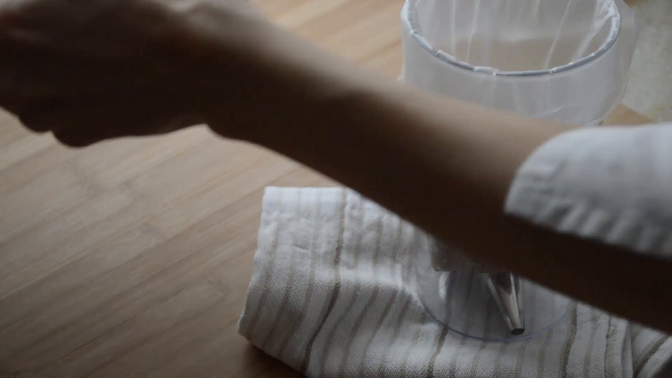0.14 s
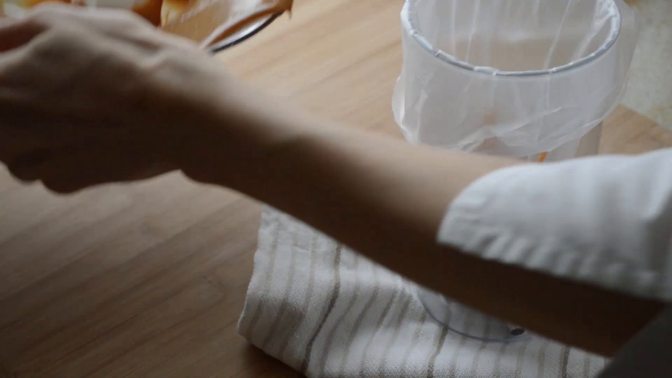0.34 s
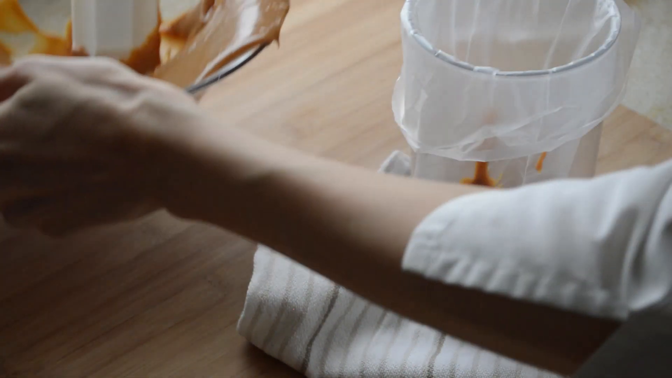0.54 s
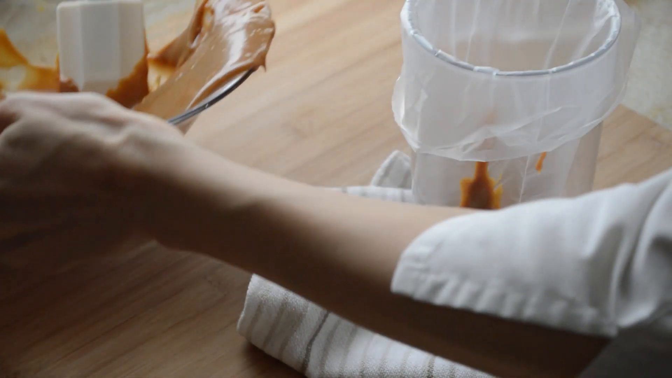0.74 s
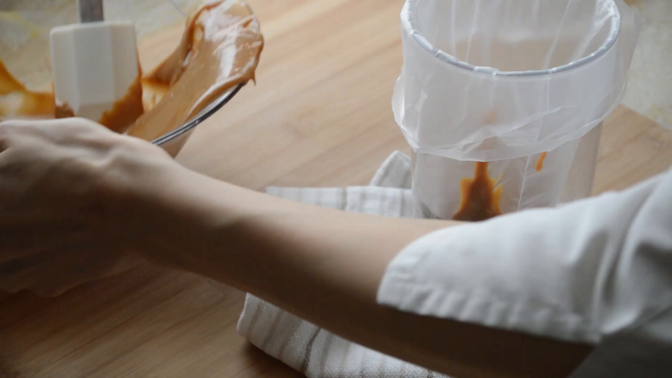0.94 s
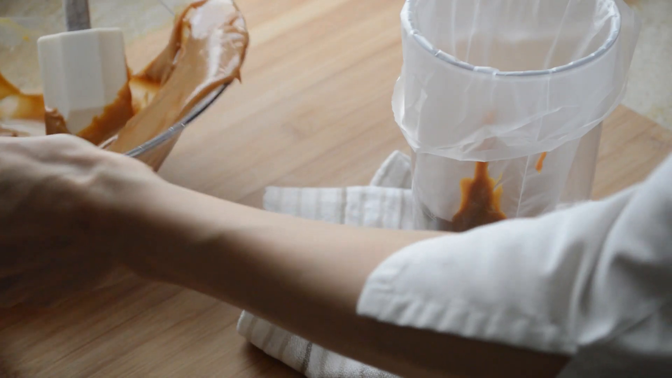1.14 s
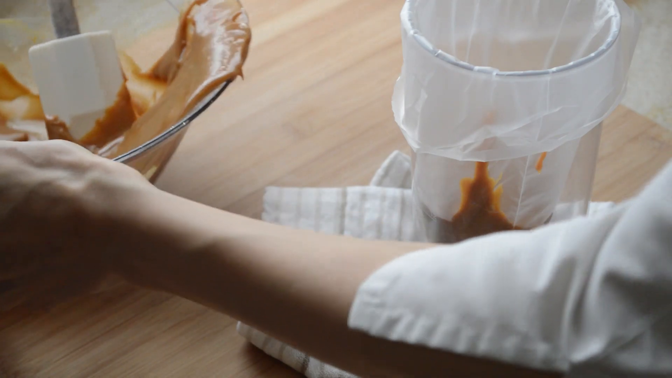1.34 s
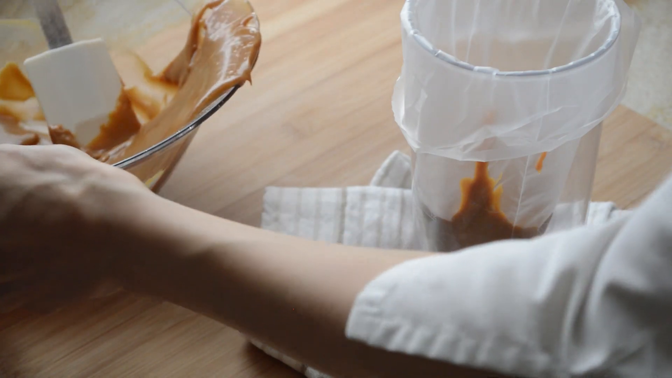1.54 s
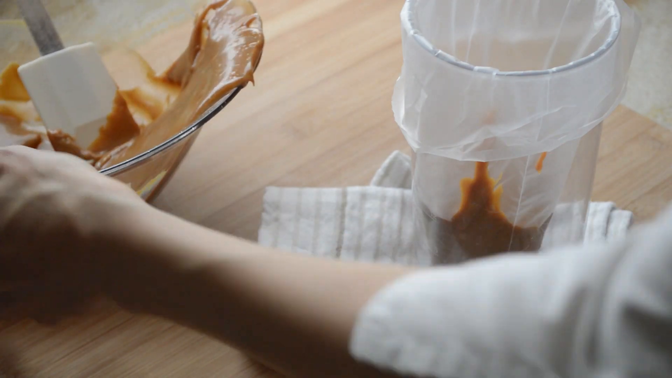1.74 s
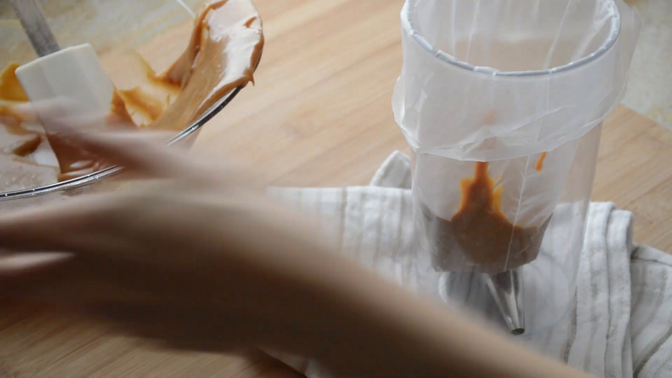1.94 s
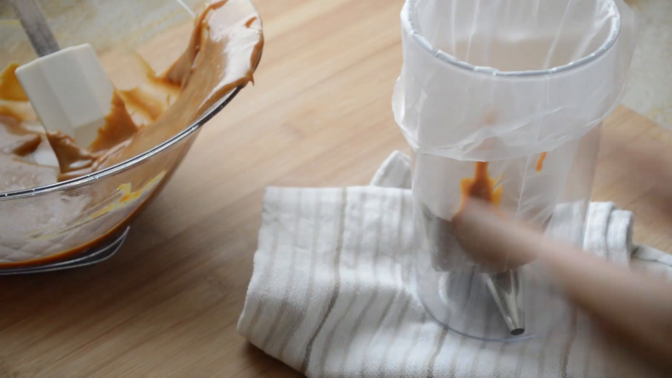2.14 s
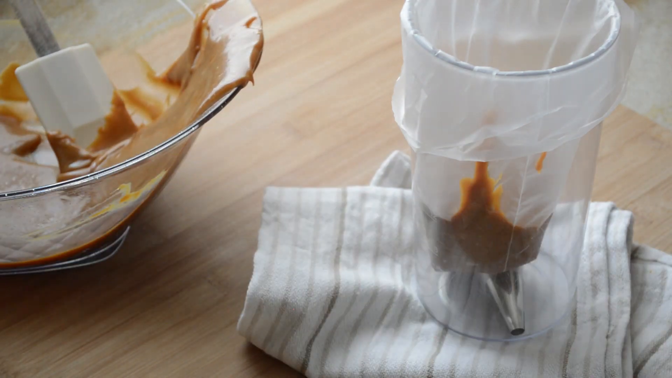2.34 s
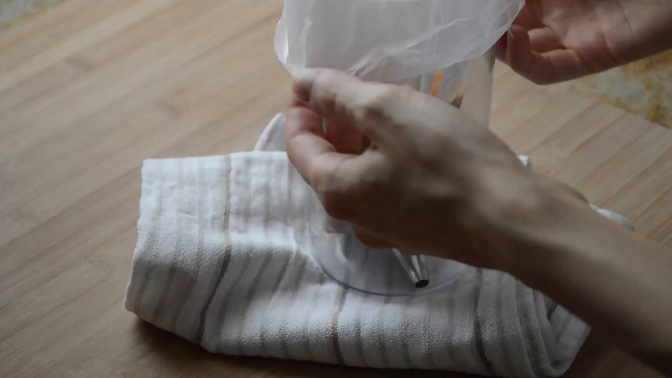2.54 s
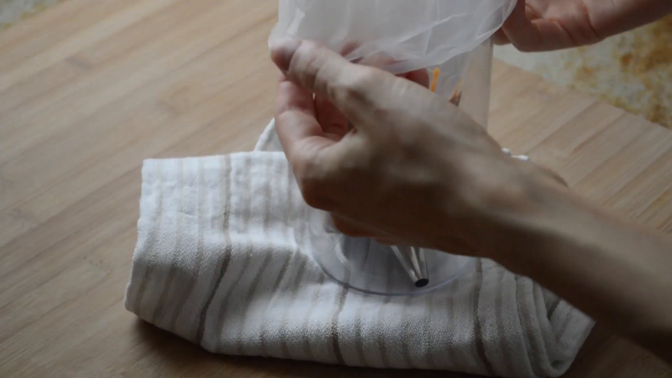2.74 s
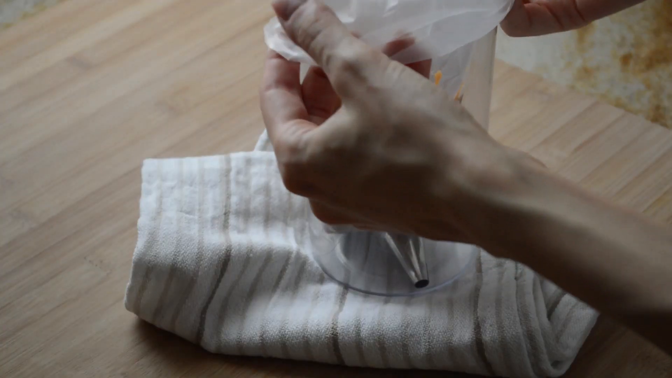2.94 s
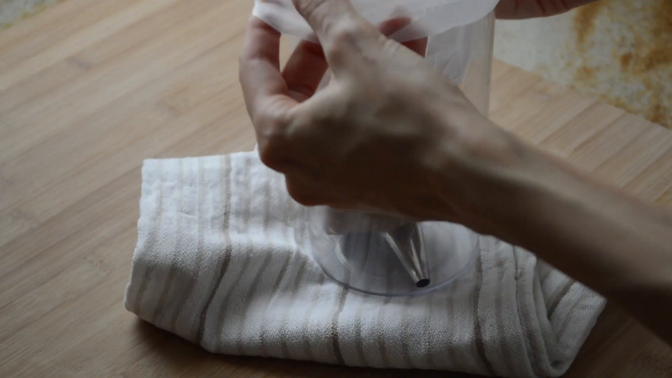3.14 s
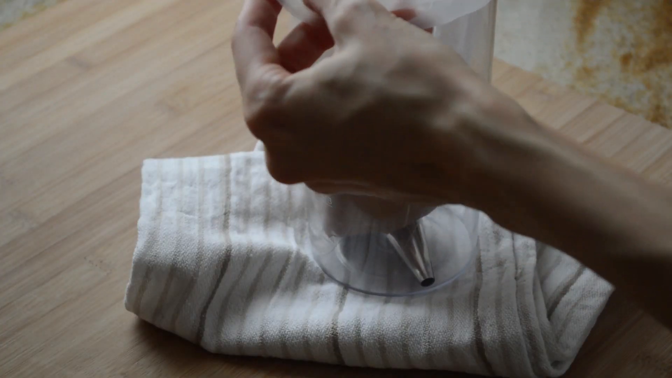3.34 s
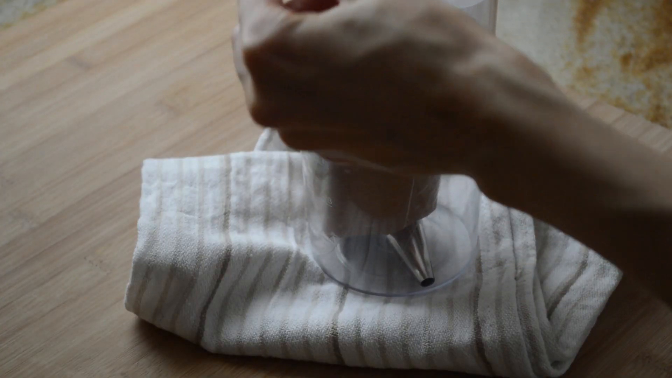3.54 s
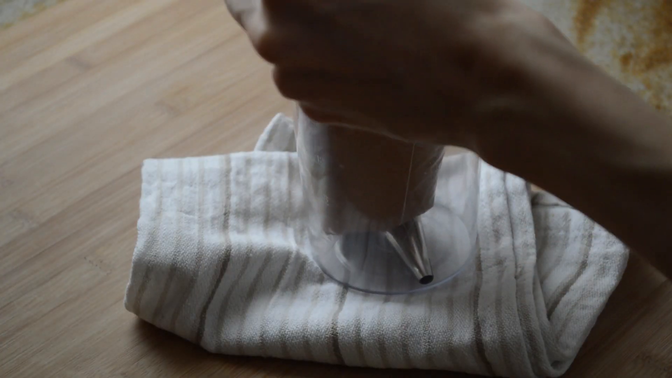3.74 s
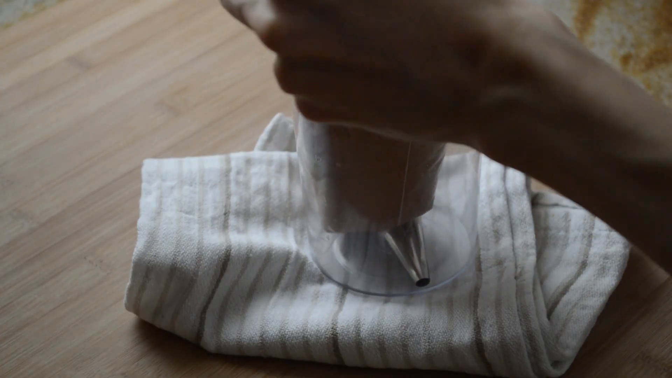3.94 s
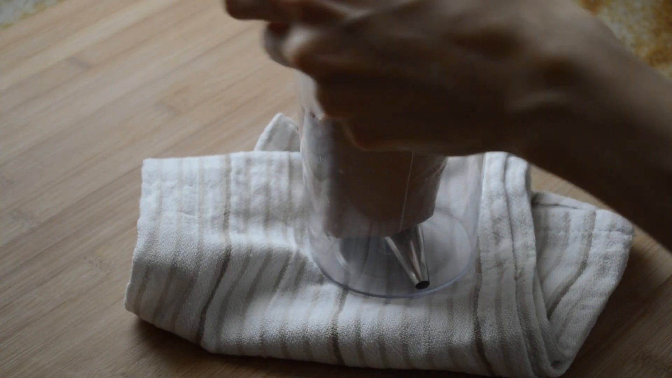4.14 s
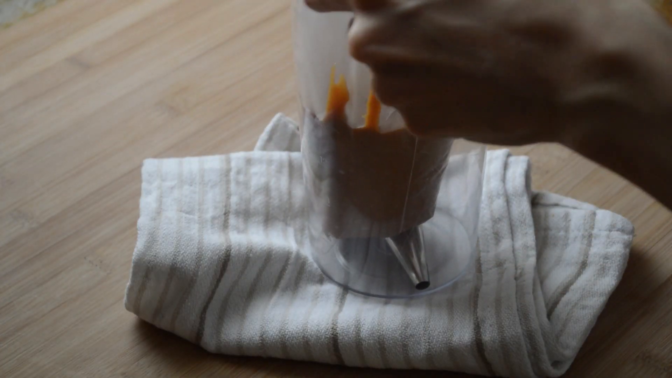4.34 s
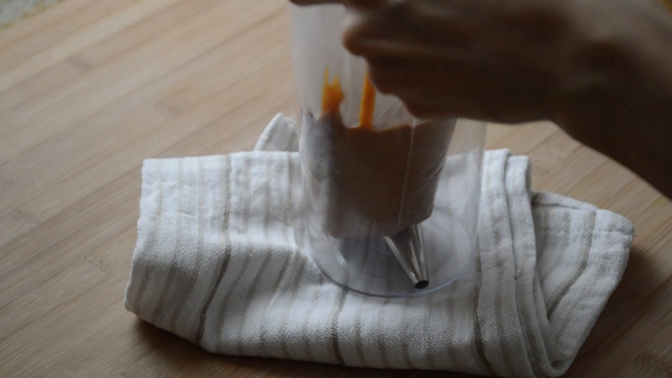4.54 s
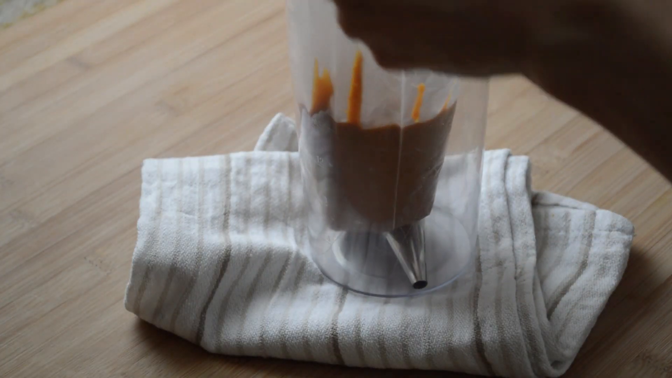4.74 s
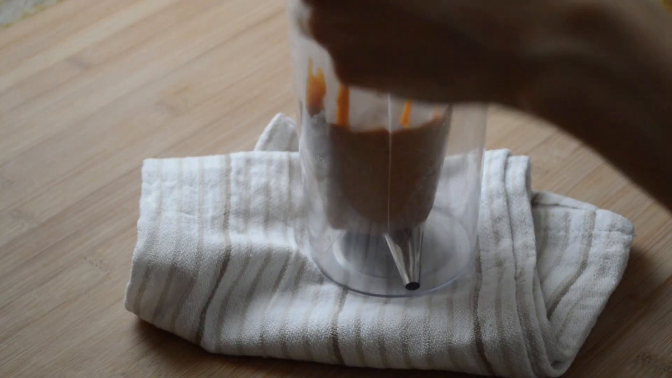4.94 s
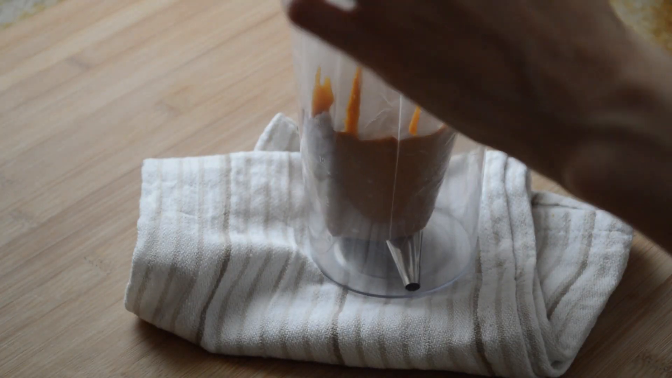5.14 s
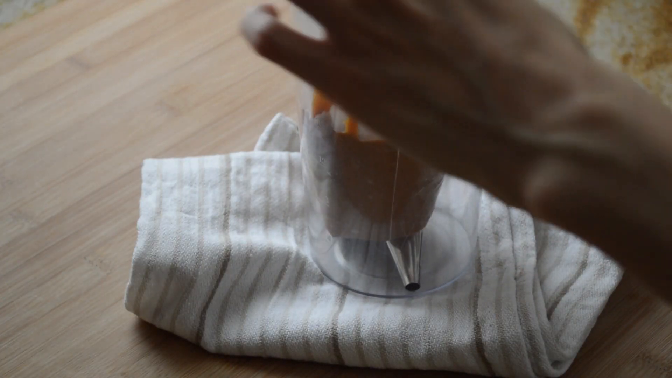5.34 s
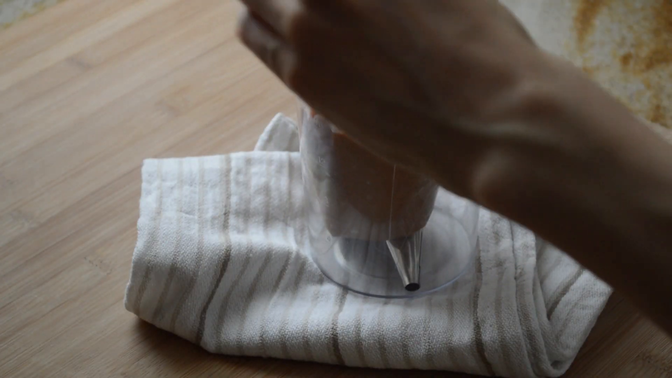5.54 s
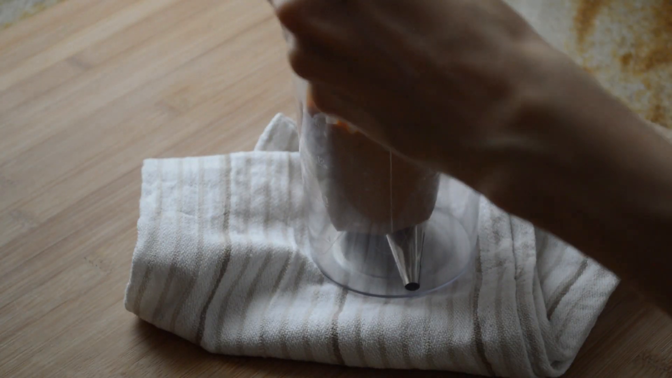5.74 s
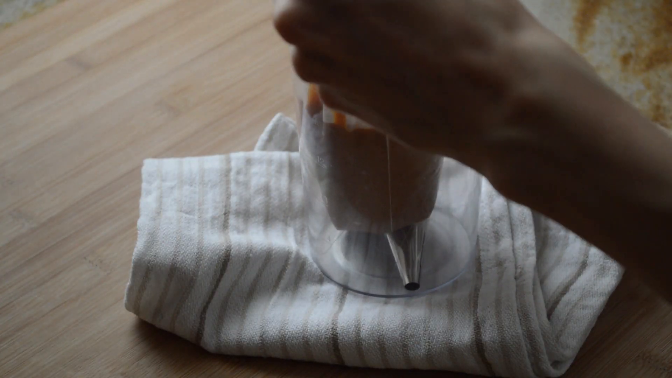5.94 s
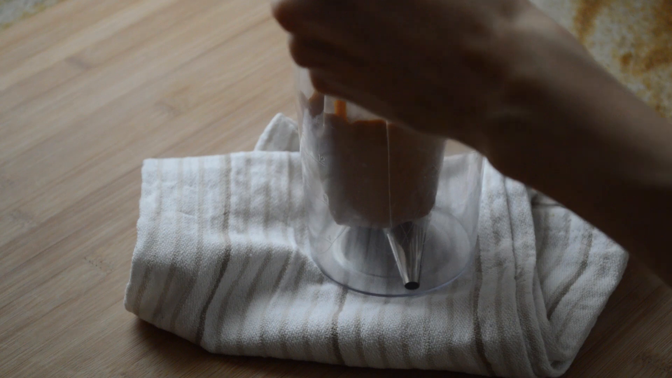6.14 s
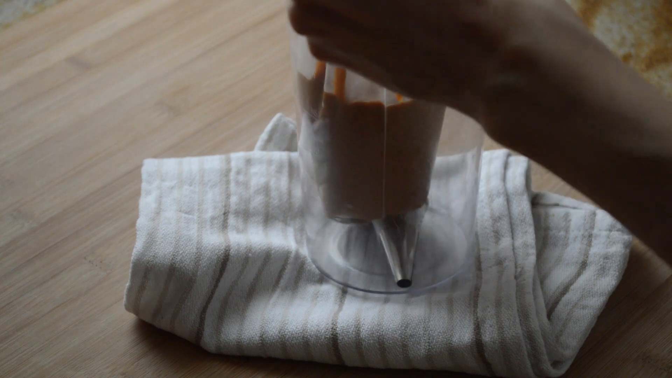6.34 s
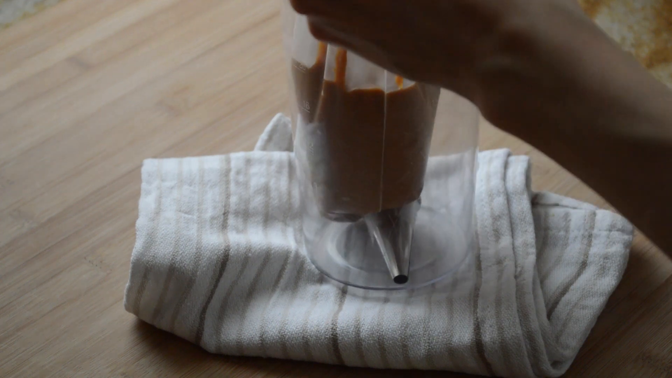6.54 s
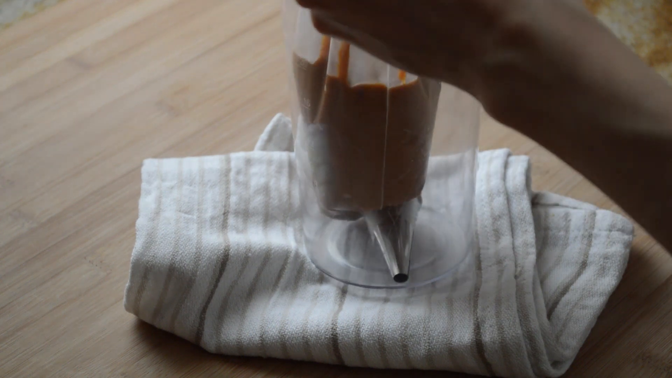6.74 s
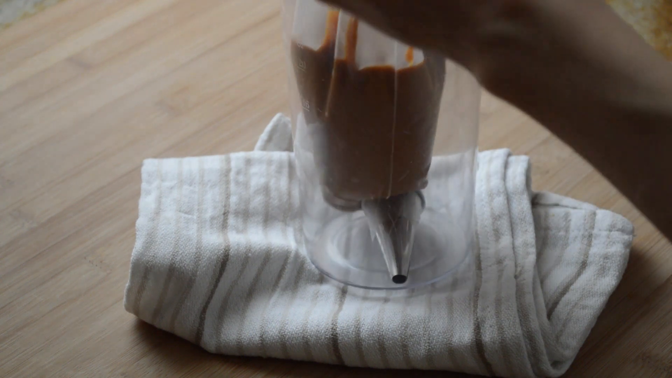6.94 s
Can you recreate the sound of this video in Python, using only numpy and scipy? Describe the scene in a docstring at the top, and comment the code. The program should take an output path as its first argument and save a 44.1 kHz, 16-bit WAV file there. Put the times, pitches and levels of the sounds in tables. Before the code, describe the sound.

In a quiet humming kitchen, a glass bowl knocks onto a wooden worktop, then a thin plastic bag crinkles loudly as it is gathered and twisted.

```python
"""A small kitchen with a low hum, heard close: a glass bowl is set down on a wooden worktop and rocks to rest.
Knocks ring decaying modes; sleeves swish as filtered noise, and fingers tick twice against a plastic jug.
Then a thin plastic piping bag is gathered and twisted shut: creases snap as millisecond noise bursts over
a dense crackle of tiny buckles, and wider folds pop and ring the hollow pouch with a sagging pitch."""
import sys
import numpy as np
from scipy import signal
from scipy.fft import rfft, irfft, next_fast_len
from scipy.io import wavfile
from scipy.ndimage import uniform_filter1d

SR = 44100
rng = np.random.default_rng(int(sys.argv[2]) if len(sys.argv) > 2 else 0)


def int16_out(signal):
    """Quantize to a 16-bit WAV file."""
    q = np.round(np.clip(np.atleast_2d(signal).T, -1, 1) * 32767)
    wavfile.write(sys.argv[1], SR, q.astype(np.int16))


N = 307818
T = np.arange(N) / SR

# colour of the thin plastic film: (f/Hz, level/dB)
FILM_COLOUR = [(1000, -21), (1400, -6.5), (1900, -2.5), (3000, -2), (4600, 1.5), (6200, -0.5), (8200, -8.5),
               (10500, -5), (12500, -8), (14500, -17.5), (16000, -28)]
# colour of the air-filled pouch: (f/Hz, level/dB)
POUCH_COLOUR = [(40, -53), (90, -36.5), (220, -12), (340, -7.5), (460, -0.5), (540, -3), (680, -3),
                (920, 2.5), (1150, -1.5), (1400, -8.5), (2200, -28.5)]
# squeezes and twists of the hands: (start t/s, length/s, crackle level/dB, treble/dB, body/dB,
# depth/dB: how much long creases favour the low end)
HAND_SQUEEZES = [(2.66, .09, -41.5, -10, -16, -19), (2.777, 0.39, -26, -4.5, -17, -13),
                 (3.142, 0.29, -25, -3, -14.5, -9.5), (3.461, .35, -25.5, -2.5, -10.5, -10),
                 (3.858, 0.085, -24.5, 2.5, -11.5, -1), (4, 0.09, -26.5, -1, -11, 3),
                 (4.216, 0.13, -31.5, 0, -6.5, -0.5), (4.394, 0.2, -26.5, -1, -8, 0),
                 (4.548, 0.25, -23.5, -1.5, -9.5, 2), (4.76, .22, -24, 2.5, -6, 8),
                 (5.046, 0.059, -35, 6, 0.5, 5), (5.343, 0.05, -51.5, -6, 2, -1),
                 (5.447, 0.32, -27, -0.5, -7.5, -0.5), (5.819, 0.21, -28, 1, -10.5, -3),
                 (6.071, 0.18, -25, 1.5, -9.5, 4), (6.296, 0.058, -27.5, 4, -5.5, 4),
                 (6.453, .05, -41.5, -8, -16, -15), (6.517, 0.052, -34, -13, -8, -3),
                 (6.618, 0.17, -29, 0.5, -12.5, 1.5), (6.8, .19, -23.5, -2.5, -10.5, 6.5)]


def undb(db):
    """Decibels to gain."""
    return 10 ** (np.asarray(db) / 20)


def unit(x):
    """Scale to rms 1."""
    return x / np.sqrt(np.mean(x ** 2) + 1e-18)


def along(points, hz):
    """Read (Hz, value) points on a log-frequency axis."""
    f, v = np.transpose(points)
    return np.interp(np.log(np.maximum(hz, 1)), np.log(f), v)


def add(out, s, x):
    """Mix x into out from time s on."""
    i = max(int(s * SR), 0)
    out[i:i + len(x)] += x[:max(len(out) - i, 0)]


def response(points, size=512):
    """Causal impulse response of unit energy with the colour of (Hz, dB) points."""
    # folding the cepstrum forward in time gives minimum phase
    cepstrum = irfft(np.log(undb(along(points, np.fft.rfftfreq(size, 1 / SR)))))
    cepstrum[1:size // 2] *= 2
    cepstrum[size // 2 + 1:] = 0
    h = irfft(np.exp(rfft(cepstrum)))
    return h / np.linalg.norm(h)


def through(x, h):
    """Pass x through an impulse response."""
    return signal.fftconvolve(x, h)[:len(x)]


def brighten(x, db, hz=5600):
    """Tip the range above hz against the range below by db, keeping the power about the same."""
    size = next_fast_len(len(x))
    f = np.fft.rfftfreq(size, 1 / SR)
    low = irfft(rfft(x, size) / (1 + (f / hz) ** 4), size)[:len(x)]
    return (low + undb(db) * (x - low)) / np.sqrt((1 + undb(2 * db)) / 2)


def walk(rate):
    """Slow chance with a spread of 1, taking a new random target rate times a second."""
    knots = rng.standard_normal(2048)
    return unit(np.interp(T * rate, np.arange(len(knots)), knots))


def ring(hz, t60, t):
    """One decaying mode."""
    return np.sin(2 * np.pi * hz * t) * np.exp(-np.log(1000) * t / t60)


def background(air_db=-50.5, waver=0.37):
    """Steady kitchen air as coloured noise, and an appliance's hum wavering in phase and strength."""
    # colour of the air: (f/Hz, level/dB)
    air_colour = [(15, -16), (35, -25), (60, -3.5), (80, -8), (112, 2.5), (160, -5.5), (250, -7.5),
                  (450, -11.5), (650, -12.5), (1000, -17.5), (2000, -23), (4000, -38), (8000, -29),
                  (16000, -28.5)]
    # partials of the hum: (f/Hz, level/dB)
    hum_partials = [(60, -64), (98.5, -58), (119, -73.5)]
    air = through(rng.standard_normal(N), response(air_colour, size=8192)) * undb(air_db)
    hum = np.zeros(N)
    for hz, db in hum_partials:
        tone = np.sin(2 * np.pi * hz * T + waver * walk(6.5))
        hum += undb(db) * unit(tone * (1 + waver * walk(7.1)))
    return air + hum


def sleeves(db=-1, rustle_db=-56.5):
    """Cotton slides with a soft hiss that swells and fades with each arm movement."""
    # arm movements that slide a sleeve: (middle t/s, half length/s, level/dB)
    swishes = [(.15, .25, -55), (.56, 0.035, -56.5), (0.934, 0.079, -62), (1.375, 0.025, -56),
               (1.853, 0.17, -56), (2.12, 0.16, -46.5), (2.4, 0.026, -46.5), (2.495, 0.029, -45.5)]
    # colour of the cloth: (f/Hz, level/dB)
    cloth_colour = [(300, -19), (900, -5.5), (2200, -3), (3300, -3), (4300, -3.5), (5600, -2.5),
                    (8000, -11.5), (12000, -16.5), (16000, -31)]
    power = np.full(N, undb(rustle_db) ** 2)  # cloth between the movements
    for s, half, swish_db in swishes:
        swell = np.exp(-((T - s) / half) ** 2 / 2)
        power += (undb(swish_db) * swell) ** 2
    return undb(db) * np.sqrt(power) * through(rng.standard_normal(N), response(cloth_colour))


def knocks(focus_db=3.5, radiate_hz=230, spread_s=0.001):
    """The bowl lands and rocks; place and hardness of each contact weight the same modes."""
    # knocks of the bowl on the worktop: (t/s, level/dB, upper limit of the contact f/Hz,
    # most excited pitch f/Hz, share of the ring time that the contact leaves)
    contacts = [(0.077, -33, 1970, 1180, 0.82), (0.994, -10, 5640, 766, 1.05), (1.052, -23, 800, 600, 1.3),
                (1.1102, -17.5, 1820, 1410, 0.55), (1.1432, -16, 910, 550, 0.67),
                (1.1494, -20, 2030, 850, 0.86), (1.2244, -11.5, 4200, 506, 0.65), (1.28, -33, 900, 335, .8),
                (1.706, -33.5, 2820, 2000, 0.73), (1.715, -38, 2470, 200, 0.88)]
    # modes of bowl and worktop: (f/Hz, level/dB, t60/s)
    bowl_modes = [(115, -8, 0.068), (210, -33, 0.03), (334, -34, .07), (407.5, -16, 0.18), (526, 2, 0.024),
                  (569, -11.5, 0.046), (643, -14, 0.12), (823, -11.5, 0.068), (1197, -10, 0.033),
                  (1845, -19.5, 0.022), (1916, -13, 0.056), (2065, -3, 0.015), (2305, -12, 0.062),
                  (2450, -19, 0.067), (3300, -17, 0.04), (3800, 5, 0.0017), (4200, -21, 0.03),
                  (5940, -28, .003)]
    out, t = np.zeros(N), T[:12000]
    hz, mode_db, t60 = np.transpose(bowl_modes)
    for s, level_db, contact_hz, centre_hz, free in contacts:
        # modes lose focus_db for each octave away from the most excited pitch
        weight = undb(mode_db - focus_db * abs(np.log2(hz / centre_hz)))
        detune = 1 + 0.023 * rng.standard_normal(len(hz))
        # bending waves are slower at low pitch, so the low modes arrive later
        lag = spread_s * np.sqrt(centre_hz / hz)
        age = np.maximum(t - (lag - lag.min())[:, None], 0)
        blow = weight @ ring((hz * detune)[:, None], free * t60[:, None], age)
        # a soft contact cannot drive the treble, and the board radiates little bass
        blow = signal.sosfilt(signal.butter(3, contact_hz, fs=SR, output="sos"), blow)
        blow = signal.sosfilt(signal.butter(1, radiate_hz, "high", fs=SR, output="sos"), blow)
        add(out, s, undb(level_db) * blow / abs(blow).max())
    return out


def ticks(fall_s=0.0042):
    """A fingertip meets the plastic jug with a small dry click: decaying noise in the jug's colour."""
    # finger ticks: (t/s, level/dB)
    touches = [(2.245, -34.5), (2.3695, -29)]
    # colour of the jug: (f/Hz, level/dB)
    jug_colour = [(300, -19), (1000, 7), (1600, -9), (2800, 0), (5000, 1), (7500, -16), (16000, -30)]
    out, t = np.zeros(N), T[:2048]
    for s, tick_db in touches:
        click = np.exp(-t / fall_s) * rng.standard_normal(len(t))
        add(out, s, undb(tick_db) / 2 * through(click, response(jug_colour)))
    return out


def effort(grip_s=0.052, relax_s=0.056, dulling=0.29):
    """Crackle level (gain), treble, body and depth (dB): squeezes build, hold and die away, ever duller."""
    power, treble, body, depth = np.zeros((4, N)) + 1e-18
    for s, length, db, treble_db, body_db, depth_db in HAND_SQUEEZES:
        settled = np.maximum(T - s - length, 0) / relax_s
        own = (undb(db) * np.clip((T - s) / grip_s, 0, 1) * np.exp(-settled)) ** 2
        power += own
        # dulling: dB of treble lost for each dB that the film has settled, up to 40 dB
        treble += own * (treble_db - dulling * 20 * np.minimum(settled / np.log(10), 2))
        body += own * body_db
        depth += own * depth_db
    # where squeezes overlap, the stronger one sets the colour
    return np.sqrt(power), treble / power, body / power, depth / power


def crackle(level, treble, body, depth, film_depth=0.47, film_split_hz=2600, pouch_split_hz=400,
            film_db=-2.0, body_db=-2.0, rate=520, spread_db=4.5, most_db=10, fall_s=0.0026,
            rub=0.15, colour_db=5):
    """Hundreds of tiny buckles a second, most weak and a few strong, over film rubbing on film."""
    starts = rng.random(N) < rate / SR
    size = undb(np.minimum(spread_db * rng.exponential(size=N), most_db))
    power = through(starts * size ** 2, np.exp(-2 * T[:1024] / fall_s)).clip(0)
    power = power / power.mean() + rub
    # the hands feed in strain steadily: after a strong buckle less is left for its neighbours
    bursts = np.sqrt(power / uniform_filter1d(power, size=1500)) * level
    film = through(bursts * rng.standard_normal(N), response(FILM_COLOUR))
    # small creases sound bright, long ones dull
    film = brighten(film, treble + colour_db * walk(200))
    pouch = through(bursts * undb(body) * rng.standard_normal(N), response(POUCH_COLOUR))
    # long creases in the tightly twisted bag feed the low end of both film and pouch
    film = brighten(film, -film_depth * depth, film_split_hz)
    pouch = brighten(pouch, -depth, pouch_split_hz)
    return undb(film_db) * film + undb(body_db) * pouch


def facet(points, patchy_db):
    """Response of one crease: the general colour with peaks and dips of its own."""
    hz, db = np.transpose(points)
    return response(np.c_[hz, db + patchy_db * rng.standard_normal(len(hz))])


def snap(treble, rise_s=0.00062, fall_s=0.0016, scatter_s=0.016, treble_haste=1.57, pouch_haste=0.64,
         split_hz=7000, scatter=0.16, patchy_db=3.5):
    """A crease lets go in a burst of flexural waves, short ones first: film crack and slower pouch thud."""
    t = T[:2048]

    def burst(age):
        """Quick rise and fall, with a weaker tail scattered off hands and folds."""
        fall = np.exp(-age / fall_s) + scatter * np.exp(-age / scatter_s)
        return (1 - np.exp(-(age / rise_s) ** 2)) * fall

    # the bag keeps changing shape, so every burst has its own noise and colour
    noise = rng.standard_normal(len(t))
    low = signal.sosfiltfilt(signal.butter(4, split_hz, fs=SR, output="sos"), noise)
    short_waves = np.sqrt(treble_haste) * burst(t * treble_haste) * (noise - low)
    waves = burst(t) * low + short_waves
    crack = brighten(through(waves, facet(FILM_COLOUR, patchy_db)), treble)
    thud = through(burst(t * pouch_haste) * rng.standard_normal(len(t)), facet(POUCH_COLOUR, patchy_db))
    return unit(crack), unit(thud)


def small_snaps(level, body, db=-8.0, spread_db=2.5, treble_db=4, colour_db=7, body_db=-3, count=150):
    """Lesser creases give way at uneven intervals, as strongly as the hands are squeezing."""
    out, first = np.zeros(N), HAND_SQUEEZES[0][0]
    gap = (T[-1] - first) / count
    for k, (late, size, colour) in enumerate(rng.standard_normal((count, 3))):
        s = first + gap * (k + late / 2)
        i = min(int(s * SR), N - 1)
        crack, thud = snap(treble_db + colour_db * colour)
        gain = level[i] * undb(db + spread_db * size)
        add(out, s, gain * (crack + undb(body[i] + body_db) * thud))
    return out


def snaps(depth, film_db=-19.0, treble_db=15, body_db=8, film_depth=0.26, film_split_hz=2600,
          travel_s=0.0008):
    """The big creases, each with its own strength and colour, thinner while the bag is still loose."""
    # the loudest creases snapping through: (t/s, level/dB, treble against the level/dB,
    # body against the level/dB), all three before the offsets film_db, treble_db and body_db
    big_creases = [(2.7125, -20.5, -19, -23), (2.7502, -8.5, -15, -40), (2.7564, -13, -17, -30),
                   (2.7681, -12, -18, -30), (2.799, -7.5, -12, -25), (2.823, -11, -18, -21),
                   (2.838, -6.5, -12, -33), (2.8709, -12, -9, -25), (2.9343, -10, -11, -22),
                   (2.9925, -13, -4, -23), (3.0082, -6, -6, -34), (3.051, -8, -17, -23),
                   (3.0708, -4.5, -7, -23), (3.1168, -9, -1, -26), (3.1632, -7.5, -9, -21),
                   (3.2006, -12, -11, -26), (3.233, -9, -3, -23), (3.2423, -5, -11, -33),
                   (3.274, -9, -19, -23), (3.3004, -5, -19, -34), (3.3421, -7, -24, -39),
                   (3.3809, -8, -13, -21.5), (3.4287, -6.5, -9, -20.5), (3.495, -10, -15, -22),
                   (3.5415, -9.5, -9, -17.5), (3.5734, -6, -21, -26), (3.596, -13, -19, -30),
                   (3.6236, -7.5, -14, -19), (3.674, -13, -10, -36), (3.693, -6, -22, -20),
                   (3.7352, -10.5, 1, -15), (3.7978, -11, -16, -20), (3.8298, -8, -13, -27),
                   (3.9038, -11, -12, -14), (3.9447, -6.5, -13, -23), (4.0187, -11, -23, -14.5),
                   (4.0502, -10.5, -29, -30), (4.0741, -10, -11, -17), (4.1832, -7, -21, -18.5),
                   (4.203, -12.5, -22, -23), (4.2767, -17, -13, -24), (4.303, -10.5, -19, -32),
                   (4.336, -12.5, -3, -36), (4.3847, -8, -8, -30), (4.4336, -9, -19, -20),
                   (4.4665, -8, -28, -17), (4.5156, -11.5, -18, -26), (4.5437, -10.5, -11, -21),
                   (4.6266, -8, -22, -32), (4.6397, -7, -21, -26), (4.6673, -17, -13, -33),
                   (4.6902, -6, -11, -25), (4.7068, -3.5, -17, -19), (4.7233, -4.5, -13, -25),
                   (4.7588, -9, -15, -13), (4.8467, -5.5, -17, -26), (4.877, -10.5, -7, -34),
                   (4.9014, -9, -17, -36), (4.9452, -6.5, -17, -26), (5.0851, -16, -12, -24),
                   (5.0967, -8.5, -22, -34), (5.1298, -18, -6, -16), (5.2584, -36.5, -30, -6.5),
                   (5.3612, -30, -33, -9), (5.373, -25, -19, -15), (5.425, -26, -27, -10),
                   (5.4326, -16, -13, -15.5), (5.467, -8, -11, -29), (5.5366, -15.5, 2, -33),
                   (5.6251, -10, 2, -16), (5.6955, -21, -11, -4), (5.7473, -8, -14, -20),
                   (5.8199, -12.5, -15, -17.5), (5.88, -15, -15, -15), (5.902, -16, -19, -13),
                   (5.9963, -8.5, -11, -19), (6.0333, -17.5, -22, -30), (6.0858, -10, -16, -16),
                   (6.13, -7.5, -18, -23), (6.1658, -10, -10, -23), (6.2213, -15.5, -16, -18),
                   (6.2486, -7, -15, -24), (6.315, -15, -18, -24), (6.4023, -15, -11, -16),
                   (6.4352, -13.5, -10, -31), (6.576, -20.5, -13, -19), (6.6519, -7.5, -14, -20),
                   (6.7165, -12, -6, -24), (6.762, -15.5, -17, -21), (6.8874, -9, -17, -21)]
    out = np.zeros(N)
    for s, db, treble, body in big_creases:
        crack, thud = snap(treble + treble_db)
        crack = brighten(crack, -film_depth * depth[int(s * SR)], film_split_hz)
        add(out, s + travel_s, undb(db + film_db) * (crack + undb(body + body_db) * thud))
    return out


def folds(db=-1, t60=0.03, rise_s=0.00024, sag=0.65):
    """A wide fold flips and rings the pouch with a short hollow pop that sags as the film slackens."""
    # wide folds flipping over: (t/s, level/dB, starting pitch f/Hz)
    flips = [(2.822, -22, 424), (2.872, -21.5, 840), (3.366, -13, 920), (3.408, -15, 1010),
             (3.948, -15, 877), (4.184, -22, 887), (4.971, -18, 1050), (5.130, -24, 760), (5.606, -19, 910),
             (5.625, -16, 913), (5.693, -21, 1010), (5.730, -32, 504), (5.777, -14, 910),
             (6.934, -15.5, 1185)]
    out, t = np.zeros(N), T[:2048]
    for s, flip_db, hz in flips:
        pop = ring(hz * (1 - sag * t), t60, t) * (1 - np.exp(-t / rise_s))
        add(out, s, undb(flip_db + db) * pop)
    return out


def room(x, tail_db):
    """The direct sound, then a diffuse noise tail whose treble dies first."""
    # ring time of the room by band: (f/Hz, t60/s)
    room_decay = [(150, 0.84), (500, 0.45), (1500, 0.52), (4000, 0.41), (8000, 0.36), (15000, 0.074)]
    t = T[:32768]
    f, noise = np.fft.rfftfreq(len(t), 1 / SR), rfft(rng.standard_normal(len(t)))
    centres, t60s = np.transpose(room_decay)
    tail = 0
    # overlapping bands share the noise, each fading at its own pace
    for share, t60 in zip(np.eye(len(centres)), t60s):
        band = irfft(noise * along(np.c_[centres, share], f))
        tail = tail + band * np.exp(-np.log(1000) * t / t60)
    tail = tail * (1 - np.exp(-t / 0.00034))
    return x + through(x, undb(tail_db) * tail / np.linalg.norm(tail))


def scene(bag_db=2):
    """The bag is near the microphone; the bowl sounds more through the room."""
    level, treble, body, depth = effort()
    film = crackle(level, treble, body, depth) + small_snaps(level, body) + snaps(depth) + folds()
    bag = undb(bag_db) * room(film + ticks(), tail_db=-13.0)
    bowl = room(knocks(), tail_db=-8.5)
    return (background() + sleeves() + bowl + bag)[None]


def record(dry, ceiling_db=-17.0, release_s=0.67, headroom=0.55, top_hz=15900):
    """A limiter ducks on the loudest bursts and lets the gain creep back; peaks round off, the top is cut."""
    loudness = np.sqrt(uniform_filter1d(dry[0] ** 2, size=88).clip(0))  # over 2 ms
    over = np.log(np.maximum(loudness / undb(ceiling_db), 1))
    # the reduction jumps up at once, then shrinks by a factor e in gain every release_s
    held = np.maximum.accumulate(over + T / release_s) - T / release_s
    limited = headroom * np.tanh(dry * np.exp(-held) / headroom)
    return signal.sosfilt(signal.ellip(10, .2, 80, top_hz, fs=SR, output="sos"), limited)


dry = scene()
out = record(dry)
int16_out(out)
```